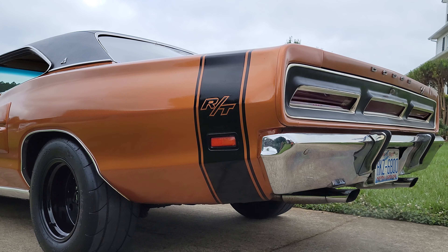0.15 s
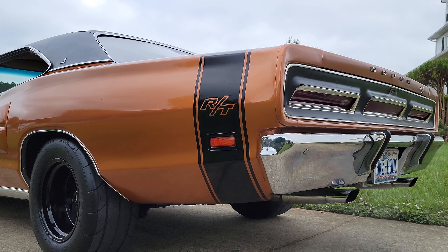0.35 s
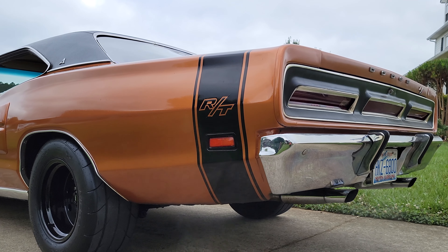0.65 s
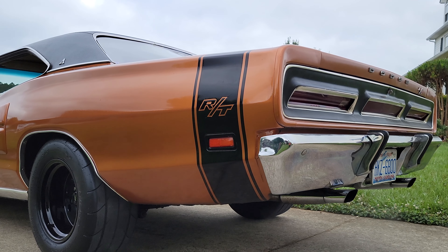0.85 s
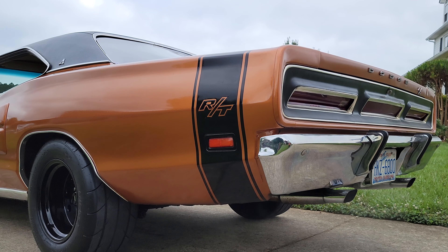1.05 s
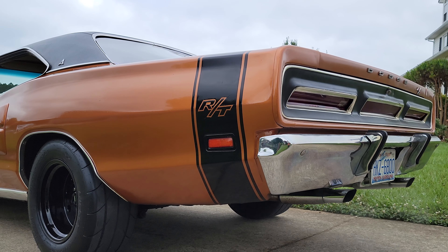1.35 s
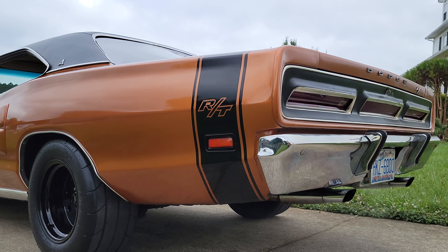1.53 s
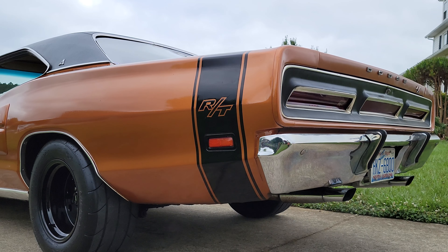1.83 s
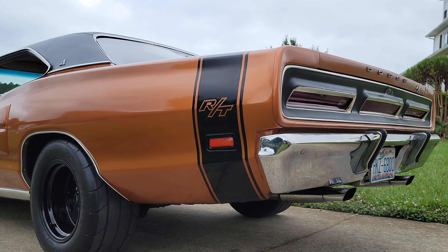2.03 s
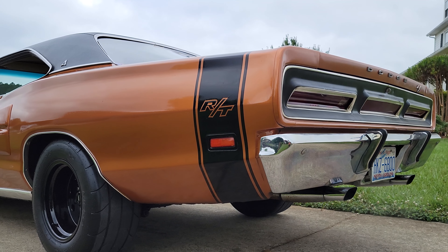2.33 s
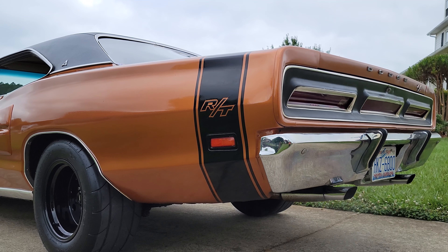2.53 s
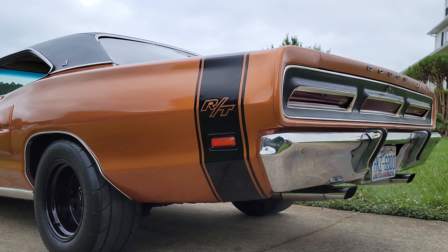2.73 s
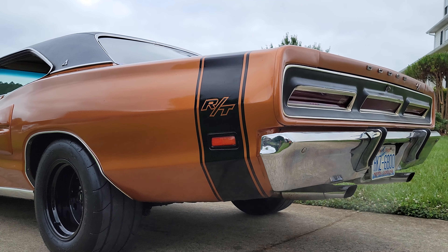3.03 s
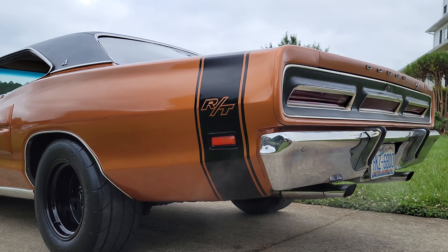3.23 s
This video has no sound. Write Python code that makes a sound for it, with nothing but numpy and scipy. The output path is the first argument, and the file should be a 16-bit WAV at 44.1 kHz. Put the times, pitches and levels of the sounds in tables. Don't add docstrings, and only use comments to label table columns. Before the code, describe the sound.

A large eight-cylinder car engine idles from an abrupt start at about 0.07 s to the end near 3.4 s, close behind twin tailpipes outdoors. Deep boom around 110 Hz throbs in a loping pattern repeating every 0.15 s, with raspy spits, burble, puffs and soft hiss. Boom weakens around 0.35-0.7, 1.85, 2.75 and 3.05 s; rasp and gas sag near 0.95 and 3.35 s. Faint whistles waver.

```python
import sys
import numpy as np
from scipy import signal
from scipy.io import wavfile

SR = 44100
rng = np.random.default_rng(int(sys.argv[2]) if len(sys.argv) > 2 else 0)


def decibels_to_gain(level_db):
    exponent = np.asarray(level_db, float) / 20
    return 10 ** exponent


def wrap_up_sound(samples):
    columns = np.atleast_2d(samples).T
    tamed = np.clip(columns, -1, 1)
    steps = np.round(tamed * 32767).astype(np.int16)
    wavfile.write(sys.argv[1], SR, steps)


N = 149058
PAD = 8192


def rms_one(x):
    return x / np.sqrt(np.mean(x ** 2) + 1e-20)


def resonate(x, hz, width_hz):
    r = np.exp(-np.pi * width_hz / SR)
    zeros = [(1 - r * r) / 2, 0, (r * r - 1) / 2]
    poles = [1, -2 * r * np.cos(2 * np.pi * hz / SR), r * r]
    return signal.lfilter(zeros, poles, x)


def twice(x, hz, width_hz):
    once = resonate(x, hz, width_hz * 1.5)
    return rms_one(resonate(once, hz, width_hz * 1.5))


def late(x, s):
    n = np.arange(len(x))
    return np.interp(n - s * SR, n, x)


def clicks(s, heights):
    out = np.zeros(N + 2 * PAD)
    i = np.round(s * SR).astype(int) + PAD
    inside = i < len(out)
    out[i[inside]] = heights[inside]
    return out + 1e-18


def padded_time():
    return (np.arange(N + 2 * PAD) - PAD) / SR


# (start [s], boom lost [0-1], rasp lost [dB], rasp level [dB], upper boom level [dB])
ENGINE_CYCLES = [(0.035, 0, -1, -0.5, 2), (0.1854, 0.08, -7, -4, 2.5), (.335, 0.72, -1, -1.5, 6),
                 (0.482, 0.37, -6, -2.5, 5.5), (0.6322, 0.67, 0.5, -1.5, 6), (0.7811, 0.2, -5.5, -2.5, 2.5),
                 (0.932, .2, 8, 0.5, 0.5), (1.0831, 0, -2.5, -0.5, -0.5), (1.2354, 0.32, 4, -0.5, 1.5),
                 (1.3862, 0.14, 0.5, 0.5, -0.5), (1.5374, 0.4, 1.5, -2.5, 3), (1.687, 0.37, -6, -4.5, 5),
                 (1.8375, 1, 5, -3.5, 6.5), (1.9837, 0.02, -5.5, -3, 1), (2.135, 0.45, 3, -2, 2.5),
                 (2.2845, 0.18, -4, -4, 1.5), (2.436, 0, -2.5, -4.5, -1.5), (2.588, 0, -3.5, -2.5, 0),
                 (2.739, 0.8, 4.5, -1.5, 3.5), (2.8872, 0.3, -4, -2, 3.5), (3.0388, 0.69, 1, -3.5, 5.5),
                 (3.1875, 0.03, -3.5, -3.5, -1.5), (3.34, 0.1, 18, 0.5, 5.5)]


def firings():
    cycle_s = 0.15
    run_in = (ENGINE_CYCLES[0][0] - cycle_s, 0, 0, 0, 0)
    rows = np.vstack([run_in, ENGINE_CYCLES])
    starts = np.append(rows[:, 0], rows[-1, 0] + cycle_s)
    s = np.interp(np.arange(8 * len(rows)) / 8, np.arange(len(starts)), starts)
    return s, np.repeat(rows, 8, axis=0)


# (frequency [Hz], t60 [s], travel time from the valve [s])
PIPE_MODES = [(61.6, 0.104, 0.0146), (109.0, 0.296, 0.0124), (121.5, 0.205, 0.0126), (186.6, 0.165, 0.01),
              (272.8, 0.112, 0.0076)]
MODE_DRIVE = [(-0.087, 0.263, -0.172, -0.141, 0.068), (-0.156, 0.263, -0.21, 0.097, -0.049),
              (-0.064, -0.018, 0.042, -0.011, 0.037), (-0.146, 0.281, -0.073, -0.044, 0.035),
              (-0.221, 0.295, -0.167, 0.108, 0.015), (-0.069, 0.078, -0.06, -0.066, 0.073),
              (-0.182, 0.358, -0.213, 0.036, -0.075), (-0.092, -0.011, 0.072, 0.035, -0.044)]
MODE_SCATTER = [.08, .07, .07, .12, .25]
# (frequency [Hz], width [Hz], level [dB])
PIPE_RUMBLE = [(42, 7, -4), (75, 15, -9), (104, 14, 0), (190, 25, -9), (235, 30, -16), (290, 50, -13)]
# (rasp [dB], puff [dB], hiss [dB], share of a stumble in boom [ratio], in gas [ratio])
CYLINDER_TRAITS = [
    (7, 7.5, -8, 0.56, 0.088),
    (0, 4.5, 4, 0.059, 0.07),
    (-4.5, -2.5, -29, 0, 0.29),
    (-9, 5.5, -8.5, 0.68, 0),
    (-4.5, -9.5, -12, 1, 1),
    (-4.5, 1.5, -21, 0.54, 1),
    (0, 2, -2.5, 0.2, 0.32),
    (-4.5, 3, -12, 0.11, 0.34),
]


def boom():
    boom_db, turbulence_db = 2.5, -24
    left_db, left_lag_s = -1.6, 0.00017
    s, cycle = firings()
    share = np.resize(np.array(CYLINDER_TRAITS)[:, 3], len(s))
    strength = 1 - np.clip(cycle[:, 1] * share, 0, 1)
    scatter = rng.standard_normal((len(s), len(PIPE_MODES)))
    ringing = 0
    for k, (hz, t60, travel_s) in enumerate(PIPE_MODES):
        r = decibels_to_gain(-60 / (t60 * SR))
        w = 2 * np.pi * hz / SR
        drive = np.resize(np.array(MODE_DRIVE)[:, k], len(s)) * strength
        drive = drive * (1 + MODE_SCATTER[k] * scatter[:, k])
        drive = drive * decibels_to_gain(cycle[:, 4] * (k >= 3))
        pulses = clicks(s + travel_s, drive)
        ringing = ringing + signal.lfilter([0, np.sin(w)], [1, -2 * r * np.cos(w), r * r], pulses)
    noise = rng.standard_normal(len(ringing))
    flow = sum(decibels_to_gain(db) * twice(noise, hz, width) for hz, width, db in PIPE_RUMBLE)
    out = decibels_to_gain(boom_db) * ringing + decibels_to_gain(turbulence_db) * flow
    return np.array([decibels_to_gain(left_db / 2) * late(out, left_lag_s), decibels_to_gain(-left_db / 2) * out])


def decay(x, tau_s):
    return signal.lfilter([1], [1, -np.exp(-1 / (tau_s * SR))], x)


def bursts(column, fall_s, floor_db):
    lead_s, rise_s = 0.0085, 0.0005
    spit_db, spit_fall_s = -6.5, 0.0011
    scatter_db, leak_follows = 2.0, 1
    s, cycle = firings()
    cylinder = np.resize(np.array(CYLINDER_TRAITS), (len(s), 5))
    lost_db = cycle[:, 2] * cylinder[:, 4]
    db = cylinder[:, column] + cycle[:, 3] - lost_db + scatter_db * rng.standard_normal(len(s))
    rise = decay(clicks(s - lead_s, decibels_to_gain(db)), rise_s)
    body = decay(rise, fall_s)
    spit = decay(rise, spit_fall_s)
    leak = decibels_to_gain(floor_db - leak_follows * np.interp(padded_time(), s, lost_db))
    return rms_one(rms_one(body + decibels_to_gain(spit_db) * spit) + leak)


def gas(flow, shared, left_peaks, right_peaks):
    colour_scatter_db, left_lag_s = 3.0, 0.00021
    s = firings()[0]
    noise = rng.standard_normal((2, 3, len(flow)))
    out = np.zeros((2, len(flow)))
    for k, (left_peak, right_peak) in enumerate(zip(left_peaks, right_peaks)):
        share = decibels_to_gain(colour_scatter_db * np.interp(padded_time(), s, rng.standard_normal(len(s))))
        common, left, right = noise[k % 2] * flow * share
        left_port = late(np.sqrt(shared) * common + np.sqrt(1 - shared) * left, left_lag_s)
        right_port = np.sqrt(shared) * common + np.sqrt(1 - shared) * right
        for port, x, (hz, width, db) in zip(out, (left_port, right_port), (left_peak, right_peak)):
            port += decibels_to_gain(db) * twice(x, hz, width)
    return out


# (frequency [Hz], width [Hz], level [dB])
LEFT_RASP = [(1377, 116, -62.5), (1763, 260, -36), (2085, 50, -38.5), (2290, 370, -35.5), (2883, 590, -50)]
# (frequency [Hz], width [Hz], level [dB])
RIGHT_RASP = [(1300, 580, -36.5), (1787, 127, -25.5), (2037, 156, -34.5), (2330, 150, -26.5),
              (2789, 125, -36)]


def rasp(flow):
    return gas(flow, 0.78, LEFT_RASP, RIGHT_RASP)


# (frequency [Hz], width [Hz], left level [dB], right level [dB])
MUFFLER_BURBLE = [(377, 43.5, -41.5, -34.5), (461, 27.5, -43, -39), (562.7, 40, -49.5, -40),
                  (721.6, 38, -44, -40), (830, 97, -48.5, -36.5), (952, 54, -45.5, -42)]


def burble(rasp_flow):
    peaks = np.array(MUFFLER_BURBLE)
    return gas(rasp_flow ** 0.35, 0.7, peaks[:, :3], peaks[:, [0, 1, 3]])


# (frequency [Hz], width [Hz], level [dB])
LEFT_PUFF = [(3800, 570, -46), (4810, 900, -49), (5890, 430, -55)]
# (frequency [Hz], width [Hz], level [dB])
RIGHT_PUFF = [(3583, 155, -42.5), (4280, 560, -47), (5180, 580, -57.5)]


def puffs():
    flow = bursts(column=1, fall_s=0.025, floor_db=-15)
    return gas(flow, 0.45, LEFT_PUFF, RIGHT_PUFF)


# (frequency [Hz], width [Hz], level [dB])
LEFT_HISS = [(7420, 1150, -55.5), (9250, 1600, -51.5), (10560, 1300, -56.5), (12300, 2000, -56),
             (14800, 2500, -68)]
# (frequency [Hz], width [Hz], level [dB])
RIGHT_HISS = [(7900, 400, -70), (8740, 800, -62.5), (10160, 910, -58), (11600, 1300, -53),
              (14600, 3200, -61)]


def hiss():
    flow = bursts(column=2, fall_s=0.027, floor_db=-9.5)
    return gas(flow, 0.45, LEFT_HISS, RIGHT_HISS)


def tailpipes():
    rasp_flow = bursts(column=0, fall_s=0.021, floor_db=-20.5)
    return rasp(rasp_flow) + burble(rasp_flow) + puffs() + hiss()


# (frequency [Hz], width [Hz], left level [dB], right level [dB])
INTAKE_WHISTLES = [(1146, 10, -9, -4), (1371, 11, -1, 4)]
# (time [s], level [dB])
INTAKE_DRAUGHT = [(0.1, -43), (0.28, -46), (0.35, -41), (0.45, -45), (0.88, -51), (0.91, -42), (1.65, -52),
                  (1.67, -49), (2.52, -48), (2.87, -41), (2.97, -55), (3.03, -41.5), (3.18, -47),
                  (3.31, -50), (3.33, -31), (3.37, -39)]


def whistles():
    patchy_db = -0.5
    draught_db = np.interp(padded_time(), *np.transpose(INTAKE_DRAUGHT))
    out = 0
    for hz, width, left_db, right_db in INTAKE_WHISTLES:
        noise, slow = rng.standard_normal((2, N + 2 * PAD))
        waver_db = patchy_db * twice(slow, 2.0, 24.0)
        tone = twice(noise, hz, width) * decibels_to_gain(waver_db + draught_db)
        out = out + tone * decibels_to_gain(np.array([[left_db], [right_db]]))
    return out


def scene():
    return (boom() + tailpipes() + whistles())[:, PAD:PAD + N]


def low_pass(x):
    return signal.sosfilt(signal.butter(12, 16520, fs=SR, output="sos"), x)


def record(dry):
    low_cut_hz, top_cut_hz, start_s = 16, 15700, 0.0696
    rounded = 2 * np.tanh(dry / 2)
    low_cut = signal.butter(1, low_cut_hz, "high", fs=SR, output="sos")
    x = signal.sosfilt(low_cut, rounded)
    x = x * (np.arange(N) >= start_s * SR)
    top_cut = signal.ellip(12, 0.5, 70, top_cut_hz, fs=SR, output="sos")
    mix = signal.sosfilt(top_cut, x)
    return low_pass(mix)


dry = scene()
out = record(dry)
wrap_up_sound(out)
```